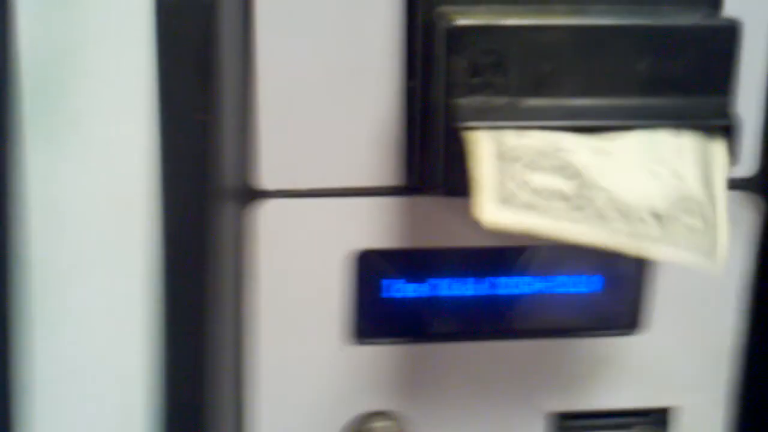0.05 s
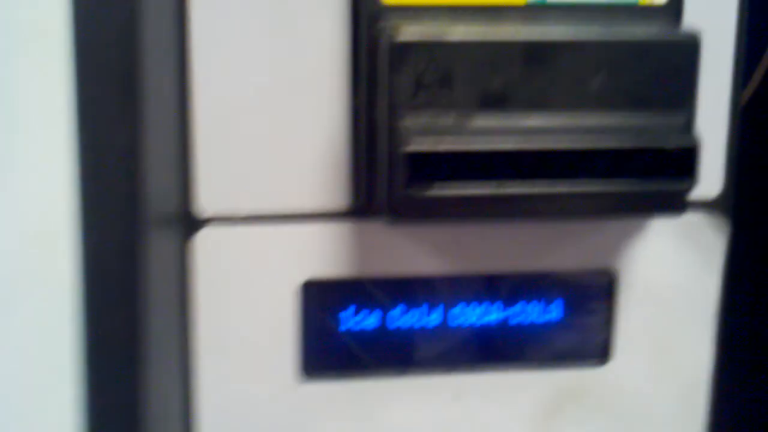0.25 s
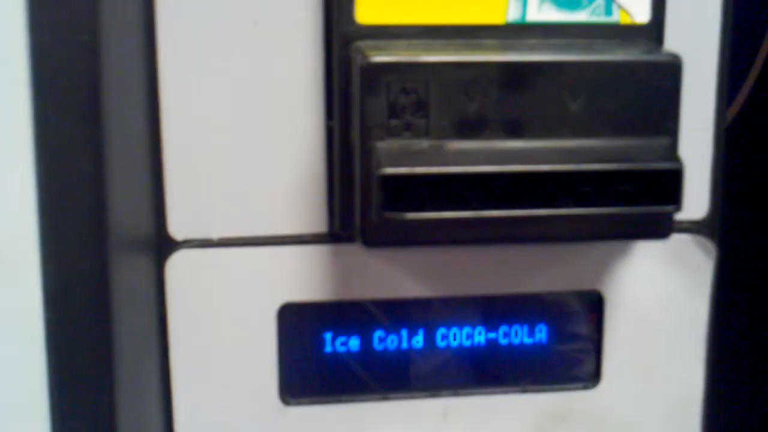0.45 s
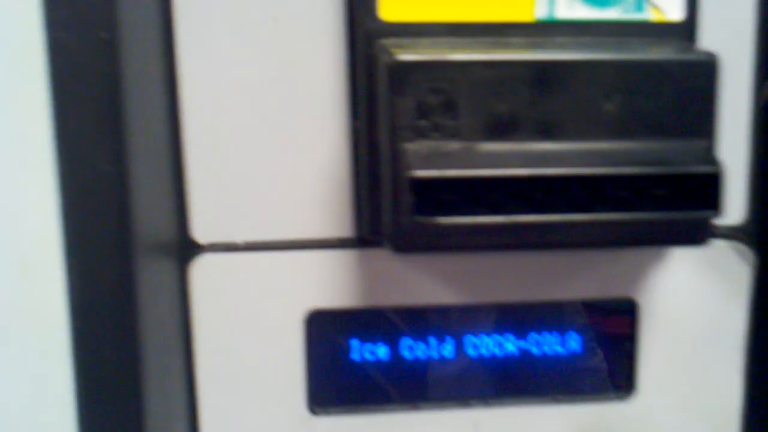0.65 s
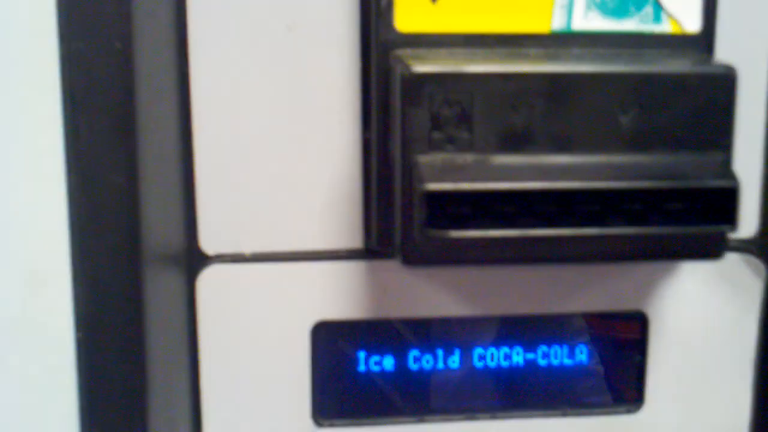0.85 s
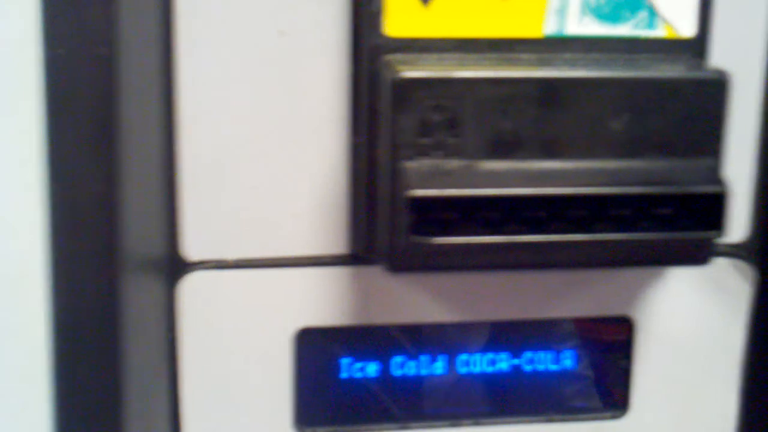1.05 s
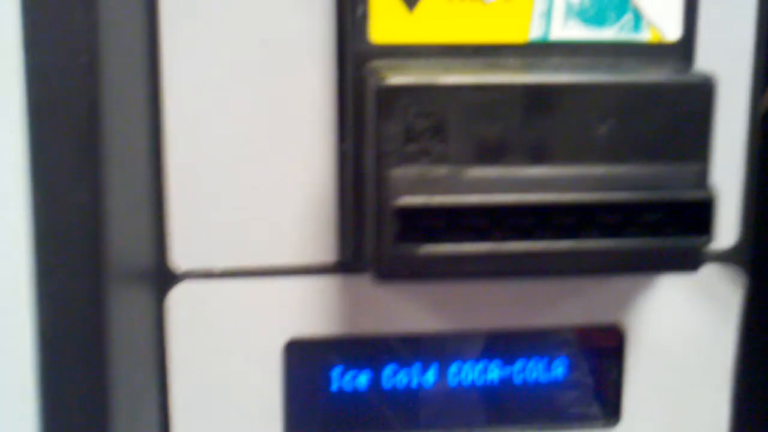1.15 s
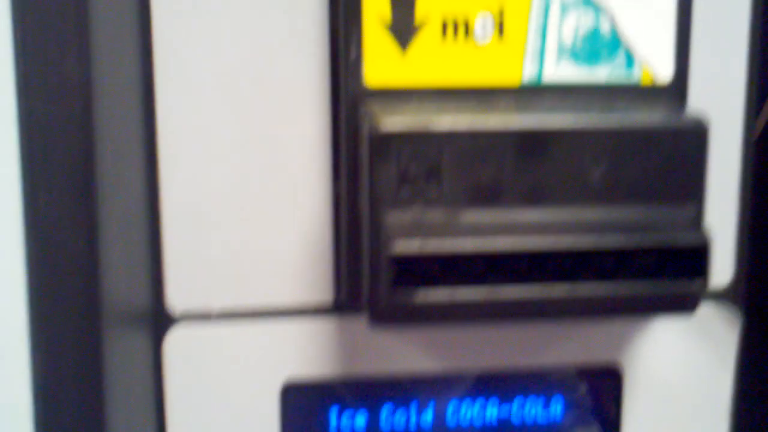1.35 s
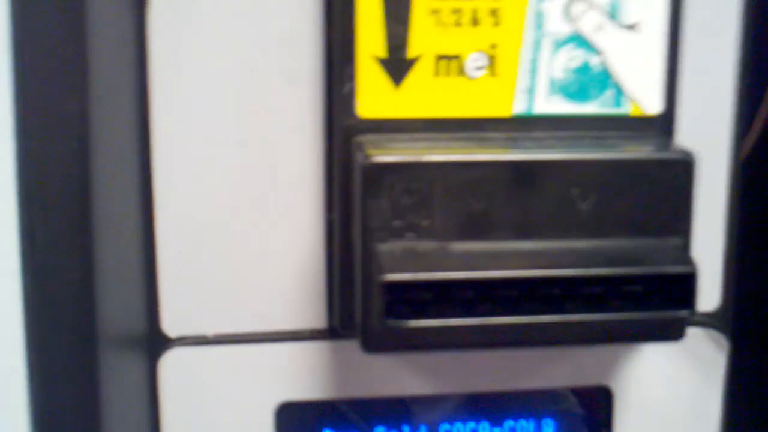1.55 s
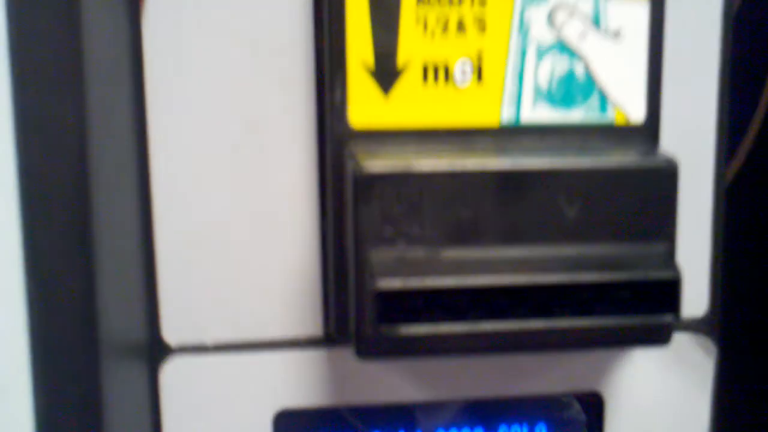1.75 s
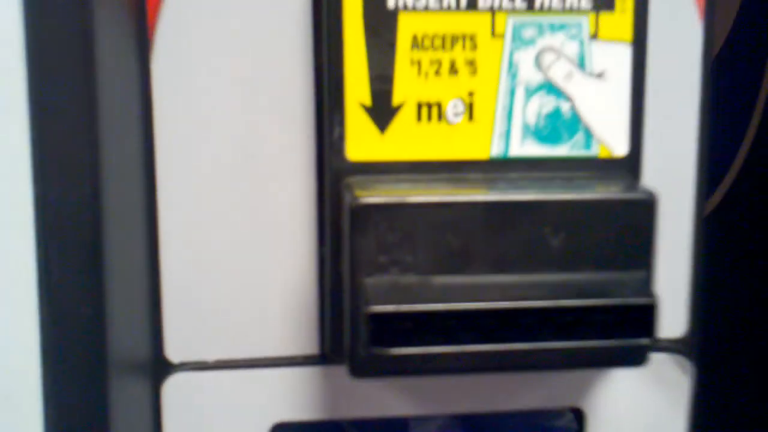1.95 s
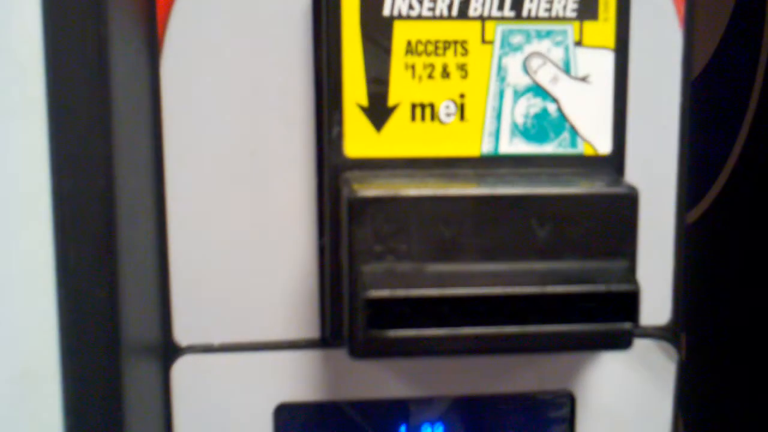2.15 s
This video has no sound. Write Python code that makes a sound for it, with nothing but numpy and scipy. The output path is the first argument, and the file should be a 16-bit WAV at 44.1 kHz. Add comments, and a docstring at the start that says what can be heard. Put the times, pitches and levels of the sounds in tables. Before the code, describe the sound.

Close to a humming vending machine, the small geared motor of the bill slot whirs with faint paper rustle, knocks and snaps to a stop. About a second later it restarts with a pop, knocking and slowing briefly.

```python
"""At a vending machine, close to the bill acceptor: a geared motor whines as it pulls a note in,
the paper flicking and rubbing in its channel. The drive knocks against its stop and coasts; a catch
snaps. After a pause there is a sharp pop and the motor spins up freely, then knocks and slows under
load as it stacks the note. The cooler hums throughout. Two close microphones are cross-fed for width."""
import sys
import numpy as np
from scipy import signal
from scipy.fft import rfft, irfft, next_fast_len
from scipy.io import wavfile
from scipy.ndimage import uniform_filter1d, map_coordinates

SR = 44100
rng = np.random.default_rng(int(sys.argv[2]) if len(sys.argv) > 2 else 0)


def wrap_up_sound(samples):
    """Save the sound to the file named by the first command line argument, as 16-bit audio."""
    columns = np.atleast_2d(samples).T
    # keep every value between -1 and 1, then stretch to whole-number steps
    tamed = np.clip(columns, -1, 1)
    steps = np.round(tamed * 32767).astype(np.int16)
    wavfile.write(sys.argv[1], SR, steps)


N = 97020

# Shaft and gear tones of the light-running motor. Each row: multiple of the shaft rate, level in dB.
GEAR_ORDERS = [(3, -12.5), (4, -18), (5, -22), (6, -12), (7, -20), (8, -22), (9, -22), (10, -23.5),
               (11, -23.5), (12, -22.5), (14, -20), (15, -24), (15.56, -31.5), (17, -41), (20, -20.5),
               (23, -26), (24, -19), (25, -19.5), (27, -20), (28, -22.5), (29, -29), (30, -25.5)]
# How alike the mechanism's noise is left and right. Each row: frequency in Hz, coherence from 0 to 1.
MECHANISM_COHERENCE = [(150, 1), (500, 0.53), (1200, 0.36), (2200, 0), (8000, 0.16)]


def amp(db):
    """Decibels to gain."""
    return 10 ** (np.asarray(db) / 20)


def unit(x):
    """Scale to rms 1."""
    return x / np.sqrt(np.mean(x ** 2) + 1e-20)


def along(points, hz):
    """Read (Hz, value) points at hz, on a log frequency axis."""
    freqs, values = np.transpose(points)
    return np.interp(np.log(hz + 1), np.log(freqs + 1), values)


def curves(rows):
    """One automation curve for each column after the time."""
    times, *columns = np.transpose(rows)
    return [np.interp(np.arange(N) / SR, times, column) for column in columns]


def since(start):
    """Seconds since start, zero before it."""
    return np.maximum(np.arange(N) / SR - start, 0)


def fade(t, t60):
    """Exponential decay, 60 dB down after t60 seconds."""
    return np.exp(-np.log(1000) * t / t60)


def wobble(rate):
    """A smooth random curve, rate knots a second."""
    return map_coordinates(rng.standard_normal(N // 20), [np.arange(N) * rate / SR], mode="mirror")


def filtered(x, response):
    """Filter x with a complex response, given as a function of Hz."""
    size = next_fast_len(N + SR // 2)
    return irfft(rfft(x, size) * response(np.fft.rfftfreq(size, 1 / SR)), size)[..., :N]


def pan(left_db):
    """Two microphone gains, the left one left_db above the right."""
    return amp(np.array([[.5], [-.5]]) * left_db)


def stereo_noise(spectrum, coherence):
    """Coloured noise of rms 1; the lower the coherence, the wider it spreads."""
    def mid_side_gains(hz):
        spread = np.arccos(np.clip(along(coherence, hz), -.999, .999)) / 2
        return amp(along(spectrum, hz)) * [np.cos(spread), np.sin(spread)]
    mid, side = filtered(rng.standard_normal((2, N)), mid_side_gains)
    return unit(np.array([mid + side, mid - side]))


def cooler(air_db=-45, drone_hz=204.6):
    """Slightly unsteady compressor and fan tones over moving air."""
    # The hum's tones. Each row: pitch in Hz, level in dB before the recorder gain.
    hum_tones = [(118.4, -50), (281, -57.5), (409.1, -62), (559.9, -60.5), (683.7, -58.5), (1095, -68),
                 (1120, -60), (1147, -66), (1238, -70.5)]
    # Recorder gain on hum and air, a set curve that ducks sharply at the snap and the pop.
    # Each row: time in seconds, recorder gain in dB, the drone's own level in dB.
    gain_curves = [(0, 2, -45.5), (.15, 4, -44), (.4, 4, -40), (.68, 7.5, -42), (.73, 1.5, -45.5),
                   (1.0, 1, -53), (1.35, 0.5, -52), (1.58, 1, -46), (1.66, -5, -51.5), (2.2, -2, -50.5)]
    # Colour of the air. Each row: frequency in Hz, relative density in dB.
    air_spectrum = [(30, 11.5), (70, -2), (100, 6), (170, 2), (290, 4.5), (450, -3.5), (680, -1.5),
                    (850, -11), (1020, -9), (1130, -5.5), (1400, -14), (2200, -19.5), (2800, -26),
                    (4000, -32.5), (14000, -51)]
    # The air is centred in the bass, wide on top. Each row: frequency in Hz, coherence.
    air_coherence = [(100, 0.96), (250, 0.86), (600, 0.7), (1200, 0.0048), (2500, 0), (8000, 0.1)]

    def tone(hz):
        level = np.sqrt(2) * amp(wobble(7.92))
        phase = 2 * np.pi * hz * since(0) + 0.2 * wobble(6.9)
        return level * np.sin(phase + rng.uniform(0, 2 * np.pi))
    recorder_gain_db, drone_db = curves(gain_curves)
    hum = sum(amp(db) * tone(hz) for hz, db in hum_tones) * pan(left_db=1.5)
    air = amp(air_db) * stereo_noise(air_spectrum, air_coherence)
    drone = amp(drone_db) * tone(drone_hz) * pan(left_db=-1)
    return amp(recorder_gain_db) * (hum + air) + drone


def paper_slide(noise, depth_db):
    """Sliding paper makes the noise swell and dip in random patches of time and frequency."""
    bands = signal.stft(noise, nperseg=256)[2]
    patches = uniform_filter1d(rng.standard_normal(bands.shape[1:]), size=5, axis=0)
    patches = uniform_filter1d(patches, size=10, axis=1)
    return signal.istft(bands * amp(depth_db * unit(patches)), nperseg=256)[1][:, :N]


def motor(speed, loudness, orders, spectrum, tone_db, mesh_db, buzz_db, buzz_count,
          jitter, flutter_db, pulsing, left_db):
    """Gear tones and a weak buzz on the shaft's multiples, with mesh noise that pulses once a turn."""
    (shaft_hz,), (level_db,) = curves(speed), curves(loudness)
    angle = 2 * np.pi * np.cumsum(shaft_hz * (1 + jitter * wobble(60))) / SR
    tones = buzz = 0
    for order, db in orders:
        level = amp(db + flutter_db * wobble(24.8)) * pan(left_db * min(order / 20, 1))
        tones += level * np.sin(order * angle + rng.uniform(0, 2 * np.pi))
    for order in range(10, 10 + buzz_count):
        level = amp(along(spectrum, order * shaft_hz.max()) + 4.5 * wobble(7.6))
        buzz += level * np.sin(order * angle + rng.uniform(0, 2 * np.pi, (2, 1)))
    mesh = paper_slide(stereo_noise(spectrum, MECHANISM_COHERENCE), depth_db=2.0)
    roughness = amp(0.62 * wobble(39.6) + 0.34 * wobble(550))
    mesh = unit(mesh * (1 + pulsing * np.cos(angle)) * roughness)
    mesh = filtered(mesh, lambda f: pan(left_db * np.minimum(f / 4000, 1)))  # the treble leans left
    return amp(level_db) * (amp(tone_db) * tones + amp(buzz_db) * unit(buzz) + amp(mesh_db) * mesh)


def motor_feeding():
    """The motor pulls the note in with a steady high whine, then drops away at the stop."""
    # Shaft speed. Each row: time in seconds, turns per second.
    speed = [(0, 161.85), (.45, 161.8), (.5, 161.5), (.55, 162.15), (.652, 162.1), (.7, 138)]
    # Fader. Each row: time in seconds, gain in dB.
    loudness = [(0, -40.5), (.2, -41.5), (.38, -39.5), (.48, -38.5), (.55, -39), (0.653, -37), (.672, -60),
                (.7, -91)]
    # High gear whine. Each row: multiple of the shaft rate, level in dB.
    whine = [(42, -22.5), (44, -28), (46, -18), (50, -10.5), (52.57, -14)]
    # Gear and roller noise. Each row: frequency in Hz, relative density in dB.
    spectrum = [(100, -4), (280, 6.5), (500, 1.5), (800, -4), (1050, 4), (1500, -3.5), (2200, 4),
                (3000, -11), (4400, -2), (5200, -2), (6000, -11), (7000, -5.5), (8400, 2), (9300, -7),
                (10000, -2.5), (12500, -8), (14000, -11)]
    return motor(speed, loudness, GEAR_ORDERS + whine, spectrum, tone_db=0, mesh_db=-2.5, buzz_db=-12.5,
                 buzz_count=40, jitter=0.0005, flutter_db=2.5, pulsing=0.083, left_db=7)


def note_ticks(t60=0.017):
    """The edge of the note flicks against the slot."""
    # Each row: start in seconds, level in dB.
    flicks = [(.009, -26.5), (.012, -30)]
    # The crisp colour of a flick. Each row: frequency in Hz, relative density in dB.
    spectrum = [(200, 7), (1200, -2), (2200, 6), (3000, 0), (4300, -2), (6000, -6), (7400, -2),
                (8500, 11.5), (10000, -8), (14000, -13)]
    out = 0
    for start, db in flicks:
        t = since(start)
        out += amp(db) * (t > 0) * fade(t, t60) * stereo_noise(spectrum, MECHANISM_COHERENCE)
    return out


def note_rubs():
    """Paper rubs on the plastic channel in short, narrow swishes, some falling in pitch."""
    # Each row: peak time in seconds, spread in seconds, pitch at the peak in Hz, glide in Hz per
    # second, half-width as a share of the pitch, level in dB.
    swishes = [(0.196, 0.027, 8170, 0, 0.087, -47.5), (0.476, 0.018, 4210, 0, 0.056, -51),
               (0.482, 0.012, 8300, 0, 0.044, -44.5), (1.955, 0.026, 8270, -2000, .035, -45),
               (1.93, 0.011, 4260, 0, .06, -57.5), (2.003, 0.022, 4530, -4500, 0.04, -49),
               (2.043, 0.012, 8030, -6000, 0.037, -44), (2.115, 0.047, 8050, 0, 0.046, -44)]
    t, out = since(0), 0
    for peak, spread, hz, glide, width, db in swishes:
        flutter = filtered(rng.standard_normal((2, N)), lambda f: 1 / (1 + (f / (hz * width)) ** 2))
        carrier = np.sqrt(2) * np.sin(2 * np.pi * (hz * t + glide * (t - peak) ** 2 / 2))
        envelope = np.exp(-.5 * ((t - peak) / spread) ** 2)
        out += amp(db) * envelope * unit(flutter) * carrier
    return out * pan(left_db=10)


def stop_knocks(rattle_db=-12, rattle_t60=0.073, low_cut_hz=150):
    """The mechanism meets its stops; the plastic case rings and rattles."""
    # Each row: start in seconds, level in dB, dull above this many Hz, attack in seconds.
    hits = [(0.6482, -20, 1700, 0.001), (0.6557, -35.5, 2500, 0.00088), (1.8791, -30, 4000, 0.00012),
            (2.159, -26, 397, 0.0055)]
    # Resonances of the case. Each row: pitch in Hz, relative level in dB, t60 in seconds.
    case_modes = [(289.5, -0.5, 0.072), (345, -7, 0.088), (510.4, -14, 0.25), (880, -12, 0.045),
                  (986, 3, 0.027), (1183, -3, 0.024), (1720, -9, 0.025), (2070, -7, 0.02),
                  (4170, -3.5, 0.018)]
    rattle_spectrum = [(100, -44), (300, -1), (2000, 5), (8000, -4)]  # Hz, relative dB
    out = 0
    for start, db, dull_hz, attack in hits:
        t = since(start)
        dull = lambda f: 1 / (1 + (f / dull_hz) ** 2)
        ring = sum(amp(level) * dull(hz) * fade(t, t60) * np.sin(2 * np.pi * hz * t)
                   for hz, level, t60 in case_modes)
        ring = filtered(ring, lambda f: 1j * f / (1j * f + low_cut_hz))
        rattle = unit(filtered(stereo_noise(rattle_spectrum, MECHANISM_COHERENCE), dull))
        onset = 1 - np.exp(-t / attack)
        out += amp(db) * onset * (ring + amp(rattle_db) * rattle * fade(t, rattle_t60))
    return out


def rollers_coasting(start=0.653, db=-46.5, t60=1.0):
    """The rollers run out after the stop with a soft, dying rustle."""
    # Colour of the rustle. Each row: frequency in Hz, relative density in dB.
    spectrum = [(100, 0), (300, -10), (1100, 0), (2200, -7), (3700, -11.5), (5500, -20), (8500, -15.5),
                (14000, -22)]
    t = since(start)
    return amp(db) * (t > 0) * fade(t, t60) * stereo_noise(spectrum, MECHANISM_COHERENCE)


def catch_snap(crack_t60=0.0037, low_cut_hz=600):
    """The small catch snaps by the right microphone: a bright crack, a short hollow ring, no bass."""
    # First touch, then the blow. Each row: start in seconds, gain in dB, attack in seconds,
    # relative crack level in dB.
    contacts = [(.6995, -10, 0.0011, -28), (0.7017, -1, 0.00016, -13)]
    # Resonances of the catch. Each row: pitch in Hz, relative level in dB, t60 in seconds.
    catch_modes = [(875, 0.5, 0.023), (1130, -8, 0.011), (1480, -8, 0.012), (1620, -12, 0.018),
                   (3816, -13.5, 0.0065), (5200, -12.5, 0.011), (9000, -22.5, 0.0029)]
    # Colour of the crack. Each row: frequency in Hz, relative density in dB.
    crack_spectrum = [(1000, -4), (2200, 4), (3400, 9), (4800, 9), (5500, -2), (6500, -11), (7300, 4),
                      (9000, 2), (10400, -16), (12000, -7), (14000, -11)]
    out = 0
    for start, db, attack, crack_db in contacts:
        t = since(start)
        ring = sum(amp(level) * fade(t, t60) * np.sin(2 * np.pi * hz * t)
                   for hz, level, t60 in catch_modes)
        crack = unit(filtered(rng.standard_normal(N), lambda f: amp(along(crack_spectrum, f))))
        onset = 1 - np.exp(-t / attack)
        out += amp(db) * onset * (ring + amp(crack_db) * fade(t, crack_t60) * crack)
    return filtered(out, lambda f: (1j * f / (1j * f + low_cut_hz)) ** 2) * amp([[-24], [2]])


def motor_restarting():
    """After the pause the motor spins up freely."""
    # Shaft speed. Each row: time in seconds, turns per second.
    speed = [(1.61, 110), (1.635, 142), (1.665, 156), (1.7, 160.8), (1.77, 162.2), (1.878, 162.2),
             (1.93, 146)]
    # Fader. Each row: time in seconds, gain in dB.
    loudness = [(1.61, -72), (1.635, -45), (1.68, -42), (1.74, -41.5), (1.8, -44), (1.878, -44),
                (1.95, -87)]
    # Gear and roller noise. Each row: frequency in Hz, relative density in dB.
    spectrum = [(100, -6), (280, 7), (1000, 4.5), (1500, 2.5), (2200, 4), (3400, -2.5), (4400, 0),
                (5700, -4.5), (7000, -3), (8200, 7.5), (10000, -3.5), (12500, -4), (14000, -6.5)]
    return motor(speed, loudness, GEAR_ORDERS, spectrum, tone_db=-2.5, mesh_db=-2, buzz_db=-13.5,
                 buzz_count=26, jitter=0.0014, flutter_db=3.5, pulsing=0.094, left_db=4)


def pop(start=1.6168, db=5, instant_share=0.59, rise_s=0.00006, decay_s=0.00031):
    """One abrupt push on the right microphone as the motor restarts."""
    t = since(start)
    rise = 1 - (1 - instant_share) * np.exp(-t / rise_s)
    return -amp(db) * (t > 0) * rise * np.exp(-t / decay_s) * np.array([[0], [1]])


def motor_stacking():
    """The motor sags under the stacker's load, then picks up again."""
    # Shaft speed. Each row: time in seconds, turns per second.
    speed = [(1.878, 162), (1.92, 146), (1.97, 148), (2.01, 153), (2.05, 158.5), (2.12, 162.2), (2.2, 169)]
    # Fader. Each row: time in seconds, gain in dB.
    loudness = [(1.85, -92), (1.885, -44), (1.93, -43), (2.0, -42), (2.06, -41), (2.12, -42.5),
                (2.2, -43.5)]
    # Low tones of the loaded gears. Each row: multiple of the shaft rate, level in dB.
    orders = [(2, -17), (3, -13.5), (4, -16), (6, -14.5), (7, -32), (8, -16), (9, -14.5), (10, -18),
              (11, -28)]
    # Gear and roller noise. Each row: frequency in Hz, relative density in dB.
    spectrum = [(100, 8.5), (280, 7), (600, 1), (1100, 8.5), (1500, 4), (2200, -1.5), (3000, -9.5),
                (3700, -10.5), (4450, 4), (5400, -2.5), (7200, -7.5), (8400, 4), (10000, -0.5),
                (12500, -7.5), (14000, -5.5)]
    return motor(speed, loudness, orders, spectrum, tone_db=0.5, mesh_db=-2, buzz_db=-18.5,
                 buzz_count=6, jitter=0.002, flutter_db=3.5, pulsing=0.1, left_db=7)


def scene(hiss_db=-64):
    """The acceptor and cooler at the two microphones, over a faint, wide hiss."""
    # Colour of the hiss. Each row: frequency in Hz, relative density in dB.
    hiss_spectrum = [(100, -2), (4000, -3), (5500, -0.5), (8500, 3), (14000, 3.5)]
    drive = motor_feeding() + motor_restarting() + motor_stacking()
    hiss = amp(hiss_db) * stereo_noise(hiss_spectrum, coherence=[(100, 0.0054)])
    rustles = rollers_coasting() + note_ticks() + note_rubs()
    return drive + hiss + rustles + cooler() + stop_knocks() + catch_snap() + pop()


def record(dry, cross_delay_s=0.0003823, bass_hz=844, low_cut_hz=100.4, ceiling=0.87, top_hz=14000):
    """Widen by cross-feeding, restore the bass, cut rumble, soft-clip the peaks and roll off the top."""
    # Each channel loses a delayed copy of the other, which also thins the bass.
    wide = dry - filtered(dry[::-1], lambda f: np.exp(-2j * np.pi * f * cross_delay_s))
    bass_tilt = lambda f: (1 + bass_hz / (1j * f + 1)) / 2
    low_cut = lambda f: signal.freqs(*signal.butter(2, low_cut_hz, "high", analog=True), f)[1] ** 2
    balanced = filtered(wide, lambda f: bass_tilt(f) * low_cut(f))
    clipped = balanced / (1 + np.abs(balanced / ceiling) ** 6) ** (1 / 6)
    return filtered(clipped, lambda f: 1 / np.sqrt(1 + (f / top_hz) ** 300))


dry = scene()
out = record(dry)
wrap_up_sound(out)
```